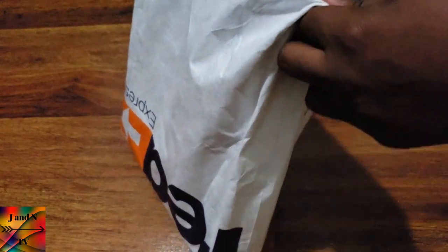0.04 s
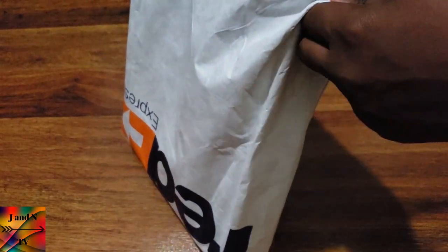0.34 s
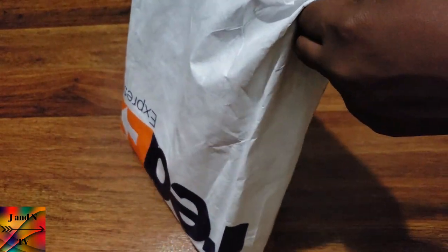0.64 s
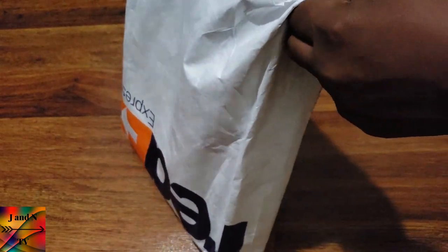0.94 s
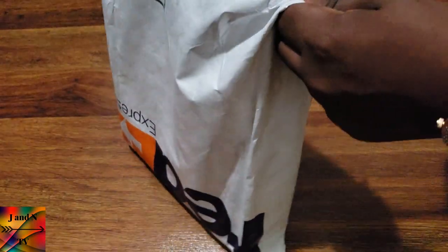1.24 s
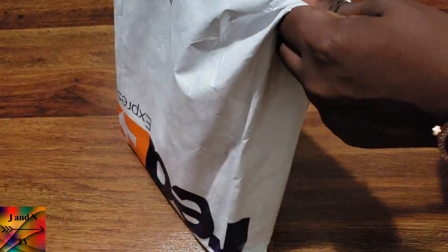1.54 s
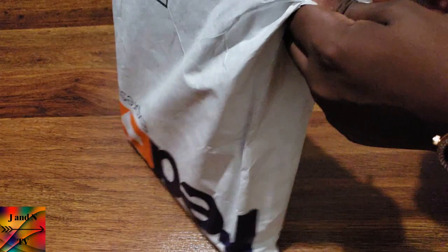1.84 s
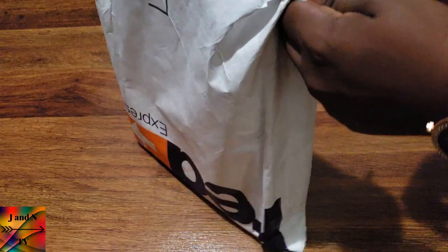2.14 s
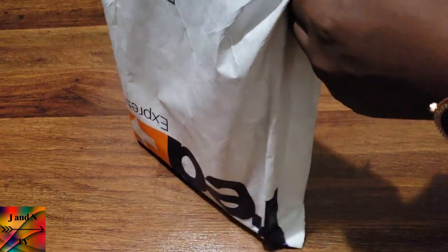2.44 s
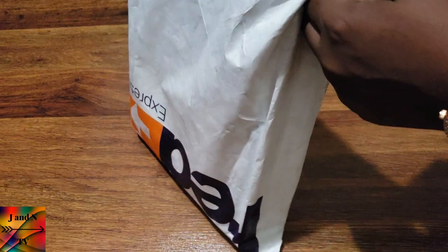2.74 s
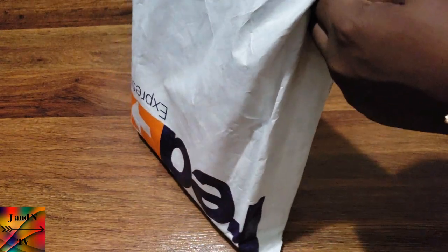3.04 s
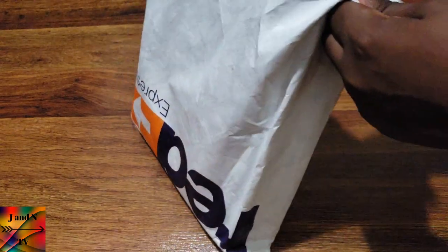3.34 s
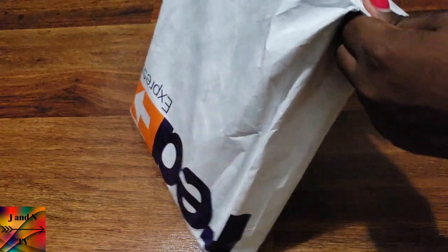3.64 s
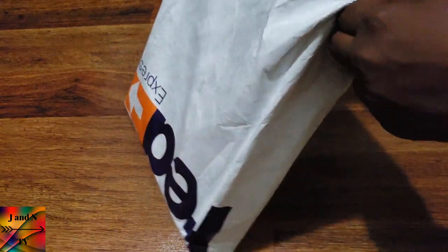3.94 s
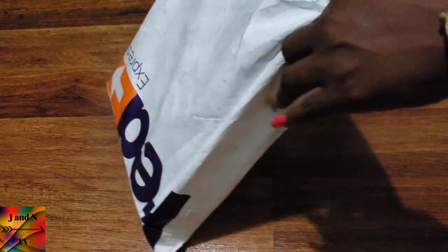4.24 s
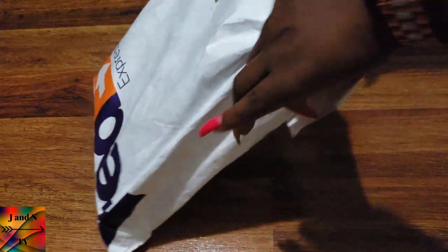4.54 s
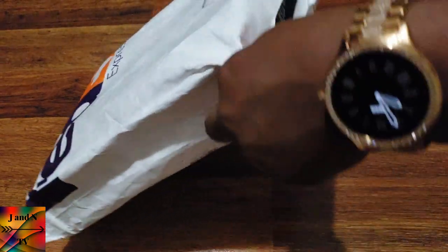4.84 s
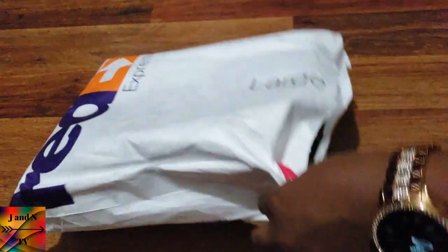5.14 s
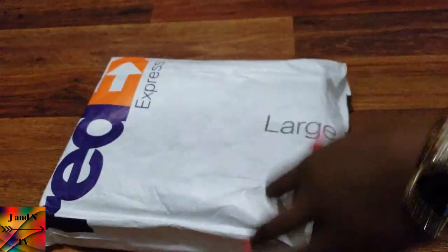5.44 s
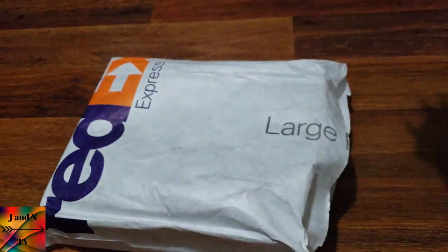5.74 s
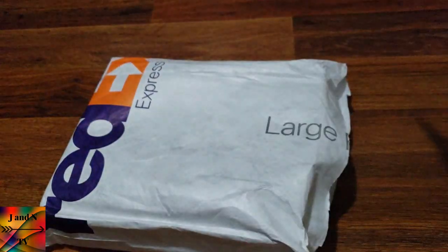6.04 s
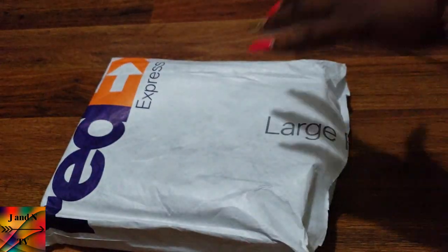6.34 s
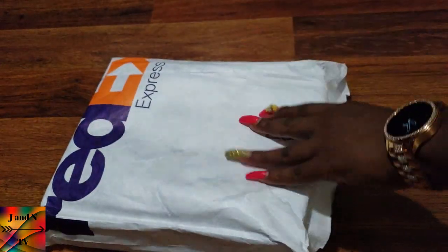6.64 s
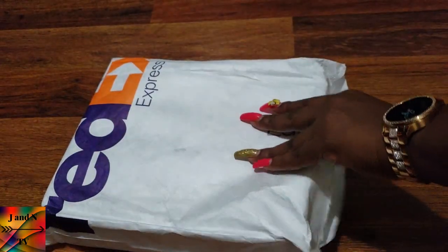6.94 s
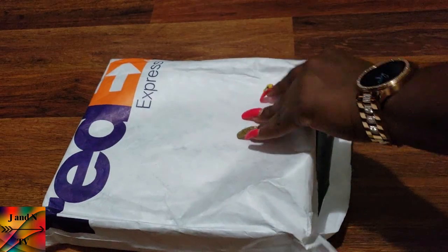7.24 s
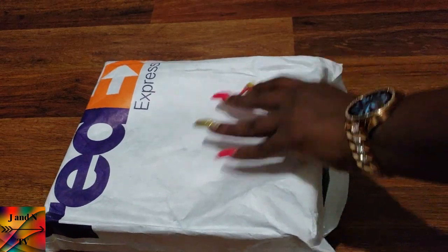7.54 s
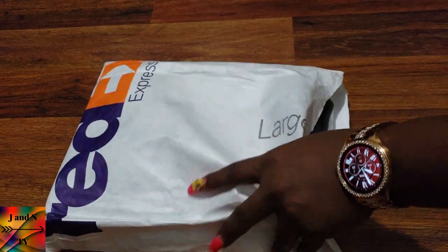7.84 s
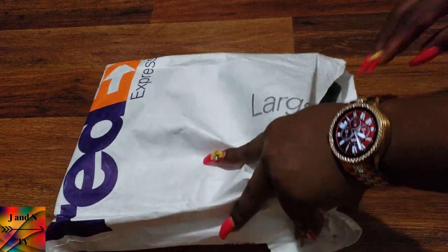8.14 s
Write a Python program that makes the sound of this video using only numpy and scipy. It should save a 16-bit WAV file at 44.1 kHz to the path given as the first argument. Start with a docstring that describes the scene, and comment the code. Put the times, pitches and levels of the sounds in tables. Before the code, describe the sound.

Light crackles of thin plastic build into sharp snaps and brief, gritty rips as a mailer bag is pulled open. The handling eases, then the parcel lands with a dull double thud and a rustle. Two thin, high bracelet clinks follow in a pause. A knock, a brief finger squeak and a faint cardboard drag lead into more crisp crumpling. Everything is close and slightly left, in a small room with faint background noise.

```python
"""A plastic mailer bag pulled open by hand, close to the microphone, over a wooden floor in a small room.
Its folds buckle with snaps and crinkles, then the seam gives way in short rips, each a run of tiny
fractures. The parcel is laid down with two thuds, the links of a metal watch bracelet clink, and
fingers push the cardboard box along inside the bag. Short reflections and faint room tone lie behind."""
import sys
import numpy as np
from scipy import signal
from scipy.fft import rfft, irfft, next_fast_len
from scipy.io import wavfile
from scipy.ndimage import map_coordinates

SR = 44100
rng = np.random.default_rng(int(sys.argv[2]) if len(sys.argv) > 2 else 0)


def generate_wav(signal):
    """Clip the signal to [-1, 1] and save it as 16-bit WAV at the path in sys.argv[1]."""
    frames = np.transpose(np.atleast_2d(signal))
    scaled = np.clip(frames, -1, 1) * 32767
    pcm = np.round(scaled).astype(np.int16)
    wavfile.write(sys.argv[1], SR, pcm)


N = 360738
TIME = np.arange(N) / SR

# Folds of film that buckle: t/s, level/dB, ring f/Hz, relative pop/dB, relative fizz/dB
FOLD_SNAPS = [(0.002, -36, 2650, -24, -7), (0.112, -34, 5800, -30, -13), (0.137, -26.5, 1980, -33, -38),
              (0.26, -32.5, 6060, -12.5, -9.5), (0.359, -41, 3700, -8, -42), (0.536, -31.5, 3200, -14, -38),
              (0.583, -42.5, 885, -6, -36), (0.625, -25, 2380, -13.5, -11.5), (0.903, -38, 1550, -30, -35),
              (0.913, -39.5, 860, -9, -34), (0.962, -42.5, 1540, -4, -23), (0.973, -35, 1560, -5.5, -15),
              (1.071, -34, 3540, -10, 0.5), (1.456, -35, 2230, -21, -7.5), (1.522, -40.5, 2650, -30, -20),
              (1.6, -12.5, 4475, -31, -13.5), (1.75, -13, 2040, -20.5, -23),
              (1.765, -13.5, 4160, -11.5, -14), (1.788, -12.5, 4700, -19, -16.5),
              (1.813, -23, 4550, -30, -18.5), (1.893, -23, 4570, -22, -0.5),
              (1.927, -18.5, 3400, -18.5, -8.5), (1.944, -20, 5400, -31, -27), (2.043, -32, 2040, -11, -35),
              (2.162, -42.5, 2320, -4.5, 0), (2.241, -38, 2680, -29, -14), (2.298, -33.5, 3200, -9, -15),
              (2.376, -37, 2610, -10, -31), (2.432, -28, 3730, -39, -10), (2.482, -13.5, 4200, -16, -11),
              (2.528, -22, 3500, -35, -1.5), (2.54, -21, 3130, -19, -8), (2.615, -23.5, 4200, -18, -20),
              (2.675, -32, 4230, -10.5, -9.5), (2.799, -19.5, 2490, -16.5, -6),
              (2.939, -31, 3250, -14.5, -9), (2.978, -25.5, 2630, -12, -4.5),
              (3.026, -25.5, 2570, -14, -14), (3.065, -21.5, 3300, -10.5, -5),
              (3.079, -15.5, 3400, -13, -5), (3.25, -27, 2310, -9, -10), (3.285, -27.5, 2520, -11, 2.5),
              (3.349, -24, 3720, -25, -10), (3.395, -19.5, 2680, -21, -8), (3.822, -47, 3830, -36, 1),
              (3.932, -38, 2040, -13.5, -13), (4.232, -41.5, 5360, -40, -12),
              (4.46, -47.5, 2430, -0.5, -24), (4.549, -40.5, 2940, -8, -36), (4.585, -35.5, 3000, -23, -29),
              (4.668, -34.5, 2960, -12.5, -8), (4.712, -34, 3330, -12.5, -17),
              (4.826, -23, 2980, -16.5, -6.5), (4.952, -19.5, 4060, -18.5, -11),
              (5.085, -34, 4430, -18, -7), (5.159, -32, 2260, -25, -13), (5.239, -30, 1720, -10, -12),
              (5.408, -25.5, 7000, -1, -8), (5.435, -29, 1810, -25, -22), (6.629, -35, 2210, -12.5, -12),
              (6.676, -28.5, 3560, -14, -18), (6.694, -21, 4640, -12, -5.5), (6.948, -31.5, 2070, -6, -38),
              (7.061, -29.5, 2360, -32, -27), (7.198, -25.5, 2460, -22, -3), (7.207, -20, 3140, -12.5, -10),
              (7.286, -24, 3000, -10, -15), (7.51, -31.5, 1860, -8, -31), (7.607, -14, 4470, -17, -11),
              (7.724, -13.5, 4800, -21, -24), (7.853, -20.5, 2530, -15.5, -1.5),
              (7.907, -17, 3200, -26, -17), (7.993, -20.5, 2650, -18, -15), (8.07, -22, 3470, -10.5, -8)]
# The seam gives way: t/s, rise/s, run/s, level/dB, weakening over the run/dB
SEAM_RIPS = [(1.746, 0.0028, 0.055, -19, 2.5), (2.442, 0.021, 0.1, -18, 17.5),
             (2.763, 0.036, 0.0094, -19.5, 1), (3.061, 0.019, 0.056, -19, -0.5),
             (3.258, 0.025, 0.024, -18, 8), (3.319, 0.013, 0.15, -18.5, 10.5),
             (3.587, 0.022, 0.058, -18, 2.5)]
# Spectrum of the tearing film: f/Hz, level/dB
TEAR_SPECTRUM = [(320, -50), (550, -21.5), (1050, -4.5), (1210, -11), (2200, -3), (2570, -1.5), (3620, 0.5),
                 (4170, -2), (7490, -0.5), (9150, -9), (12300, -1), (15100, -9.5), (16000, 0), (16700, -44)]
# Spectrum of a tough strand of the seam breaking: f/Hz, level/dB
STRAND_SPECTRUM = [(500, -29.5), (1100, -7), (2400, -2.5), (3050, -1.5), (3500, 5.5), (4200, 2), (5500, -6),
                   (9000, -22), (16000, -39)]
# How hard the hands work, a list each for grip, tear, turn and push: t/s, crinkle/dB, flapping/dB
HAND_EFFORT = [
    [(0.09, -66, -82), (0.15, -56, -70), (0.28, -52.5, -67), (0.51, -71, -68), (0.65, -62, -56.5),
     (0.81, -68, -83), (0.87, -56.5, -62), (1.07, -48, -60), (1.15, -68.5, -69), (1.5, -60, -64.5),
     (1.58, -62.5, -84)],
    [(1.85, -46.5, -48), (1.98, -43.5, -49), (2.22, -63, -76), (2.41, -61, -66), (2.56, -50, -59),
     (2.74, -57, -64), (2.9, -54.5, -64), (3.4, -44, -51), (3.77, -71, -64)],
    [(3.82, -55, -66), (4.05, -65.5, -80), (4.2, -70.5, -87), (4.42, -68.5, -90), (4.48, -58, -59),
     (4.7, -52.5, -60.5), (4.93, -57.5, -56), (5.14, -48.5, -54), (5.23, -43, -46), (5.3, -58, -62),
     (5.42, -33.5, -43), (5.5, -65.5, -73)],
    [(6.645, -46, -47), (6.72, -41.5, -55), (6.9, -56.5, -50.5), (7.02, -51, -54.5), (7.26, -44.5, -51),
     (7.39, -59.5, -63), (7.58, -62.5, -56.5), (7.66, -35.5, -45), (7.9, -37.5, -45.5), (8.04, -57, -55),
     (8.17, -53, -58)],
]
# The film sweeps over the box or under a hand: t/s, length/s, hiss/dB, crinkle/dB
FILM_SWEEPS = [(-0.03, 0.043, -36.5, -33.5), (1.157, 0.12, -69, -60.5), (1.34, 0.037, -66, -60.5),
               (1.712, 0.037, -62.5, -37.5), (2.949, 0.1, -52, -41.5), (4.081, 0.11, -54, -54.5),
               (5.328, 0.045, -43.5, -44), (7.03, 0.091, -55, -74), (7.17, 0.066, -46, -38.5),
               (7.411, 0.17, -52.5, -47.5), (7.59, 0.05, -41, -39), (7.663, 0.076, -34.5, -29),
               (7.78, 0.034, -44, -49)]
# Spectrum of small creases: f/Hz, level/dB
CRINKLE_SPECTRUM = [(380, -33.5), (650, -3), (931, -3.5), (1030, -4.5), (1230, -1.5), (1410, -1),
                    (2760, 1.5), (3160, -1), (4680, -1), (9500, -11), (12400, -31), (20900, -120)]
# Spectrum of the flapping sheet: f/Hz, level/dB
FLAP_SPECTRUM = [(45, -22.5), (125, 4), (190, 3), (420, 3.5), (700, 0.5), (1150, -3), (2600, -38.5)]
# Spectrum of rubbed film: f/Hz, level/dB
RUB_SPECTRUM = [(4200, -39.5), (7600, 0.5), (9600, -3), (12100, 9), (15800, 1)]
# Fingertips skid on the film: t/s, level/dB, t60/s
FINGER_SKIDS = [(6.697, -21.5, 0.048), (7.001, -45.5, 0.23)]
# The box knocks on the floor or under the fingers: t/s, level/dB, f/Hz, jostle t60/s, relative knock/dB
BOX_THUDS = [(1.6, -44, 129, 0.093, 1), (1.75, -35.5, 305, 0.18, -4), (1.973, -43, 113.2, 0.18, -16),
             (3.284, -34.5, 330.5, 0.16, -5), (5.227, -29.5, 189, 0.11, -5.5), (5.259, -47, 170, 0.12, -7),
             (5.407, -22.5, 71.5, 0.31, -7.5), (5.434, -40, 163.6, 0.11, -10), (6.695, -30, 387, 0.25, -1)]
# The box is nudged along: t/s, hold/s, level/dB
BOX_NUDGES = [(6.8, 0.2, -48), (6.977, 0.046, -43.5), (7.096, 0.2, -50), (7.304, 0.1, -48)]
# The bracelet clinks: t/s, level/dB
BRACELET_CLINKS = [(5.911, -34), (6.2926, -28.5)]
# Modes of its metal links: f/Hz, relative level/dB, t60/s before the wrist damps them
LINK_MODES = [(3850, -10, 0.12), (4710, -25, 0.18), (6460, -16, 0.34), (7600, -7, 0.13), (12000, 0, 0.17),
              (12500, -5, 0.11), (14500, -0.5, 0.076), (15200, 1.5, 0.15), (15800, -2, 0.18),
              (15640, -17, 0.14)]
# Decay of the small room: f/Hz, t60/s
ROOM_DECAY = [(110, 0.21), (520, 0.2), (3600, 0.21), (9200, 0.19), (15200, 0.2)]
# Spectrum of the still room: f/Hz, level/dB
ROOM_TONE_SPECTRUM = [(15, -52.5), (25, -16.5), (48, -4.5), (61, -13.5), (87, -4), (114, -13), (130, -12),
                      (170, -12), (217, -32.5), (309, -19.5), (545, -30.5), (2050, -36.5), (2690, -34.5),
                      (14800, -40.5), (16000, -60)]


def film_snaps():
    """Each big buckle cracks, rings its fold, pops the panel around it and throws off a high fizz."""
    out = np.zeros((2, N))
    for start, db, ring_hz, pop_db, fizz_db in FOLD_SNAPS:
        t60 = 0.028 * amp(-0.14 * db)  # harder snaps are crisper
        flip = buckle(flutter=0.19, t60=t60, apart=0.71)
        crack = band(flip, ring_hz * 0.27, ring_hz * 1.6)
        crack = sized(band(crack, 710, 7000, order=3), 0.00094)
        ring = signal.lfilter(*signal.iirpeak(ring_hz, Q=4.5, fs=SR), flip)
        ring = sized(band(ring, 650, 8600, order=2), 0.0005)
        ring_db = 2.5 * np.log2(3000 / ring_hz)  # broad, low folds ring out more
        fizz = sized(band(buckle(flutter=0.2, t60=0.029, apart=0.87), 7100, 22000, order=2), 0.005)
        pop = sized(band(buckle(flutter=0.31, t60=t60, apart=0.19), 150, 960, order=2), 0.003)
        snap = crack + amp(ring_db) * ring + amp(pop_db) * pop + amp(fizz_db) * fizz
        add(out, start, amp(db) * snap)
    return panned(out, 2.5)


def seam_rips():
    """The seam lets go in fast, tiny fractures and a few tougher strands, shaking the stretched sheet."""
    tear = sum(amp(db) * stroke(start, rise, run, sag_db, release_t60=0.094)
               for start, rise, run, db, sag_db in SEAM_RIPS)
    catches = unit(amp(2 * wobble(170)))  # the tear sticks and runs on, many times in each rip
    fractures = amp(-5) * crackle(TEAR_SPECTRUM, per_s=2000, spread_db=3.5, apart=0.81, folds=12)
    strands = amp(-10) * crackle(STRAND_SPECTRUM, per_s=260, spread_db=0, apart=0.64)
    shaking = amp(-24) * crackle(FLAP_SPECTRUM, per_s=750, spread_db=2, apart=0.28)
    return panned(tear * catches * (fractures + strands + shaking), 3)


def film_handling():
    """Fingers crumple and rub the film: creases, stray ticks, flapping and fine hiss come in clumps."""
    effort, flap = gain_curves(HAND_EFFORT, fade_s=0.025)
    crinkle, rub = effort, amp(-10) * effort
    rise_s = 0.022
    for start, length, hiss_db, crinkle_db in FILM_SWEEPS:
        sweep = stroke(start, rise_s, hold=length - rise_s, sag_db=1.5, release_t60=0.07)
        crinkle = crinkle + amp(crinkle_db) * sweep
        rub = rub + amp(hiss_db) * sweep
        flap = flap + amp(crinkle_db - 16.5) * sweep
    clumps = unit(amp(3.46 * wobble(70)))
    creases = amp(1.5) * crinkle * crackle(CRINKLE_SPECTRUM, per_s=1000, spread_db=2, apart=0.9, folds=10)
    ticks = amp(-8) * effort * crackle(CRINKLE_SPECTRUM, per_s=40, spread_db=5.5, apart=0.94)
    sheet = amp(-1.5) * flap * crackle(FLAP_SPECTRUM, per_s=1200, spread_db=5, apart=0.49)
    hiss = rub * crackle(RUB_SPECTRUM, per_s=1700, spread_db=2.5, apart=0.35)
    return panned(clumps * (creases + ticks + sheet + hiss), 2.1)


def buckle(flutter, t60, apart):
    """A fold flips: one spike, then bending waves that rattle briefly through the sheet."""
    t = TIME[:SR // 25]
    flip = flutter * amp(-60 * t / t60) * stereo_noise(len(t), apart)
    flip[:, 0] += 1
    return flip


def crackle(spectrum, per_s, spread_db, apart, folds=8):
    """Tiny buckles at random moments, shared among a few folds that each ring their own way."""
    out = np.zeros((2, N))
    for _ in range(folds):
        fires = rng.random(N) < per_s / folds / SR
        sizes = amp(spread_db * np.minimum(rng.exponential(size=N), 3))
        spikes = fires * sizes * rng.choice([-1, 1], N)
        flip = buckle(flutter=0.31, t60=0.017, apart=apart)
        out += signal.oaconvolve(spikes[None], flip, axes=1)[:, :N]
    return unit(coloured(out, spectrum))


def finger_squeaks():
    """A fingertip skids briefly: fast slips ring one narrow band of the taut film."""
    out, t = np.zeros((2, N)), TIME[:SR // 4]
    for start, db, t60 in FINGER_SKIDS:
        slips = unit(band(stereo_noise(len(t), 0.7), 4450, 5300, order=2))
        add(out, start, amp(db - 60 * t / t60) * slips)
    return panned(out, 2.5)


def box_thuds():
    """The box takes a soft blow: one damped swing, a hollow knock of its walls, and the contents jostle."""
    out, t = np.zeros((2, N)), TIME[:SR // 2]
    for start, db, hz, t60, knock_db in BOX_THUDS:
        swing = np.tile(np.sin(2 * np.pi * hz * t) * amp(-60 * t / 0.014), (2, 1))
        jostle = band(stereo_noise(len(t), 0.15), hz * 0.65, hz * 1.5, order=2) * amp(-60 * t / t60)
        knock = band(stereo_noise(len(t), 0.33), 270, 600, order=3) * amp(-60 * t / 0.042)
        thud = sized(swing, 0.0032) + sized(jostle, 0.0036) + amp(knock_db) * sized(knock, 0.0099)
        add(out, start, amp(db) * thud)
    return panned(out, 2.8)


def box_slide():
    """Cardboard drags under the fingers and its hollow body hums."""
    push = sum(amp(db) * stroke(start, rise=0.025, hold=hold, sag_db=8.5, release_t60=0.2)
               for start, hold, db in BOX_NUDGES)
    jerks = unit(amp(2.9 * wobble(35)))  # it sticks and slips
    body = unit(band(stereo_noise(N, 0.21), 350, 465, order=2))
    return panned(push * jerks * body, 1.5)


def bracelet():
    """Metal links touch and rattle; the wrist damps their ring at once."""
    out, t = np.zeros((2, N)), TIME[:SR // 3]
    attack = 1 - np.exp(-t / 0.0005)
    wrist_damping = amp(-60 * t / 0.025)
    for start, db in BRACELET_CLINKS:
        modes = sum(amp(level - 60 * t / t60) * np.sin(2 * np.pi * (hz * t + rng.random((2, 1))))
                    for hz, level, t60 in LINK_MODES)
        ring = modes * attack * wrist_damping
        rattle = band(stereo_noise(len(t), 1.0) * amp(-60 * t / 0.18), 9800, 22700)
        add(out, start, amp(db) * (sized(ring, 0.0036) + sized(rattle, 0.0035)))
    return panned(out, 1.3)


def reflections(x, build_s=0.0075):
    """The small room's reflections thicken and die away; their pattern shifts as the bag moves."""
    out, hop = np.zeros((2, N)), SR // 4
    for start in range(0, N, hop):
        hz, t, (common, own) = signal.stft(rng.standard_normal((2, SR // 3)), SR, nperseg=256)
        apart = (hz / (hz + 600))[:, None]  # long waves reach both sides of the microphone alike
        diffuse = np.array([common + apart * own, common - apart * own]) / np.hypot(1, apart)
        envelope = amp(-60 * t / along(ROOM_DECAY, hz)[:, None]) * (1 - np.exp(-t / build_s))
        tail = signal.istft(diffuse * envelope, SR, nperseg=256)[1]
        tail /= np.linalg.norm(tail[0])
        add(out, start / SR, signal.fftconvolve(x[:, start:start + hop], tail, axes=1))
    return out


def room_tone():
    """The still room: soft noise, a low drone and a faint narrow hiss."""
    air = amp(-67.5) * unit(coloured(stereo_noise(N, 0.55), ROOM_TONE_SPECTRUM))
    drone = amp(-71.5) * unit(band(stereo_noise(N, 0.11), 73, 83, order=2))
    hiss = amp(-80) * unit(band(stereo_noise(N, 0.7), 2620, 3020, order=2))
    return panned(air + drone + hiss, 2.9)


def stroke(start, rise, hold, sag_db, release_t60):
    """Gain of one movement: it builds up, weakens while it lasts, and dies away."""
    t = TIME - start
    attack = np.clip(t / rise, 0, 1) ** 2
    held = np.clip((t - rise) / hold, 0, 1)
    released = np.clip((t - rise - hold) / release_t60, 0, 2)
    return attack * amp(-sag_db * held - 60 * released)


def gain_curves(tables, fade_s):
    """One gain curve for each dB column; it fades out beyond the ends of each table."""
    total = 0
    for rows in tables:
        times, *columns = np.transpose(rows)
        gate = np.clip(1 + np.minimum(TIME - times[0], times[-1] - TIME) / fade_s, 0, 1)
        total = total + gate * amp([np.interp(TIME, times, db) for db in columns])
    return total


def wobble(rate):
    """A smooth random curve, rate knots a second."""
    return map_coordinates(rng.standard_normal(int(N * rate / SR) + 4), [TIME * rate])


def stereo_noise(size, apart):
    """Noise common to both channels, plus a share (apart) that differs between them."""
    common, own = rng.standard_normal((2, size))
    return unit(np.array([common + apart * own, common - apart * own]))


def coloured(x, spectrum):
    """x through a minimum-phase filter shaped by (f/Hz, level/dB) points."""
    size = 2048
    shape_db = np.maximum(along(spectrum, np.fft.rfftfreq(size, 1 / SR)), -90)
    cepstrum = irfft(np.log(amp(shape_db)))
    cepstrum[1:size // 2] *= 2
    cepstrum[size // 2 + 1:] = 0
    impulse = irfft(np.exp(rfft(cepstrum)))
    return signal.oaconvolve(x, impulse[None], axes=1)[:, :x.shape[1]]


def along(points, hz):
    """(f/Hz, value) points read on a log axis."""
    freqs, values = np.transpose(points)
    return np.interp(np.log(hz + 1), np.log(freqs + 1), values)


def band(x, lo_hz, hi_hz, order=1):
    """Causal band-pass."""
    edges = [lo_hz, min(hi_hz, SR / 2 - 1)]
    return signal.sosfilt(signal.butter(order, edges, "band", fs=SR, output="sos"), x)


def amp(db):
    """Decibels to gain."""
    return 10 ** (np.asarray(db) / 20)


def unit(x):
    """x at rms 1."""
    return x / np.sqrt(np.mean(x ** 2) + 1e-20)


def sized(x, span):
    """Stereo x with the energy of rms 1 held for span seconds."""
    return x * np.sqrt(span * SR / (np.sum(x ** 2) / 2 + 1e-20))


def panned(x, db):
    """Left louder than right by db."""
    return x * amp([[db / 2], [-db / 2]])


def add(track, start, x):
    """Mix x into the track at start seconds."""
    part = track[:, max(round(start * SR), 0):][:, :x.shape[1]]
    part += x[:, :part.shape[1]]


def scene():
    """Bag, box and bracelet close up and a little left of the microphone, with the room behind."""
    bag = film_snaps() + seam_rips() + film_handling() + finger_squeaks()
    close = bag + box_thuds() + box_slide() + bracelet()
    return close + amp(-6) * reflections(close) + room_tone()


def record(dry):
    """The camera's microphone drops the deepest bass and keeps nothing above its band limit."""
    low_cut_hz, top_hz, edge_hz = 42, 15900, 500
    size = next_fast_len(N + SR // 2)
    hz = np.fft.rfftfreq(size, 1 / SR)
    high_cut = np.clip((top_hz - hz) / edge_hz + 0.5, 0, 1) ** 2
    spectrum = rfft(band(dry, low_cut_hz, SR / 2, order=3), size)
    return irfft(spectrum * high_cut, size)[:, :N]


dry = scene()
out = record(dry)
generate_wav(out)
```